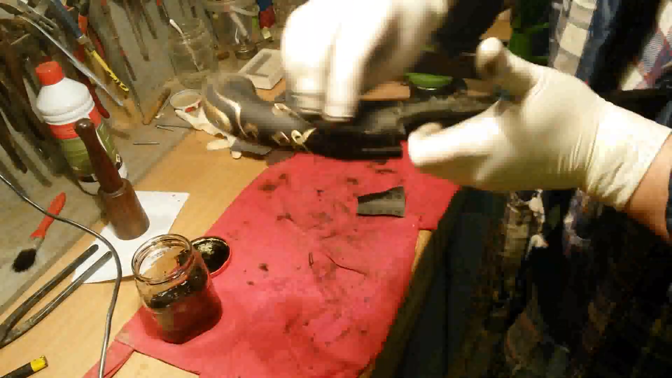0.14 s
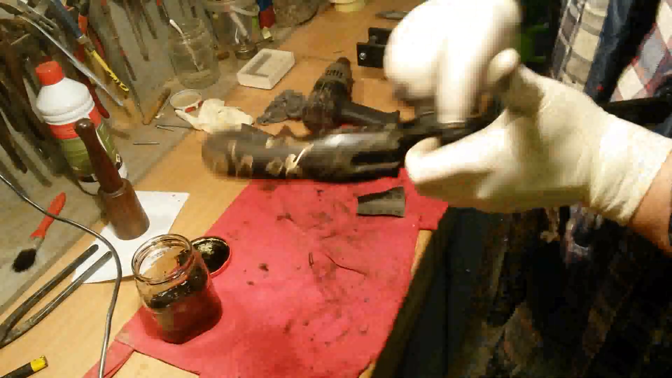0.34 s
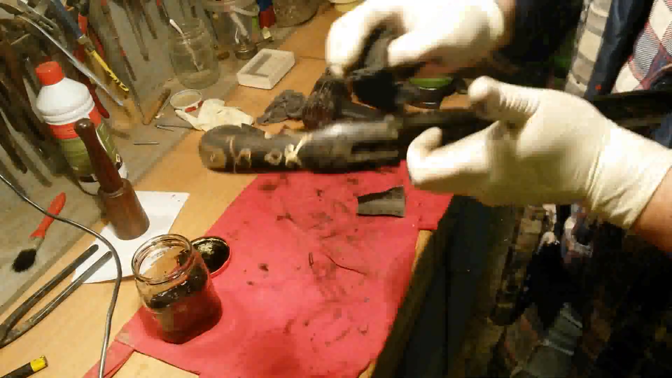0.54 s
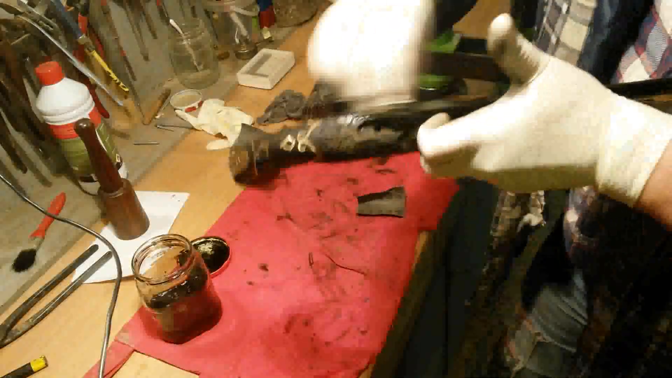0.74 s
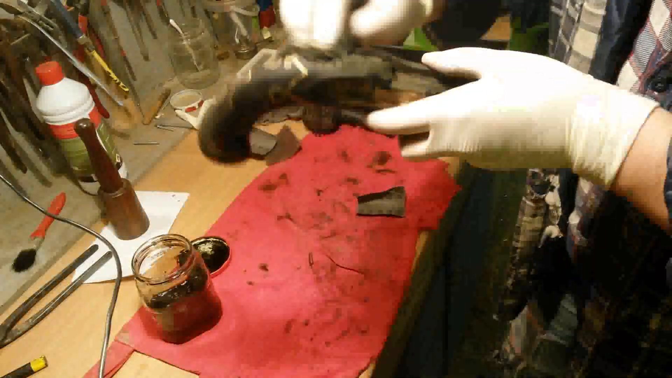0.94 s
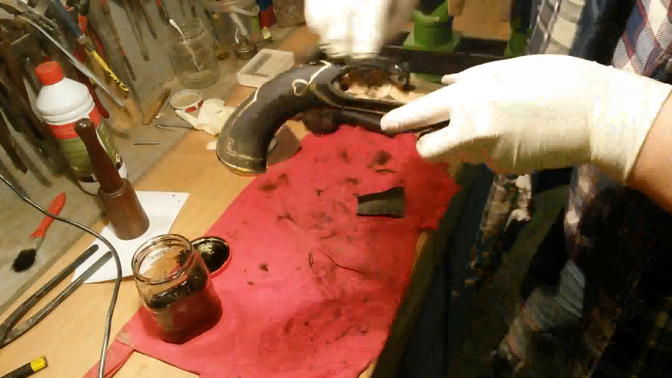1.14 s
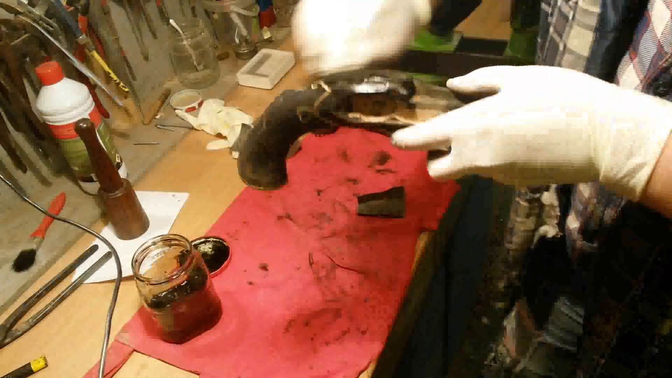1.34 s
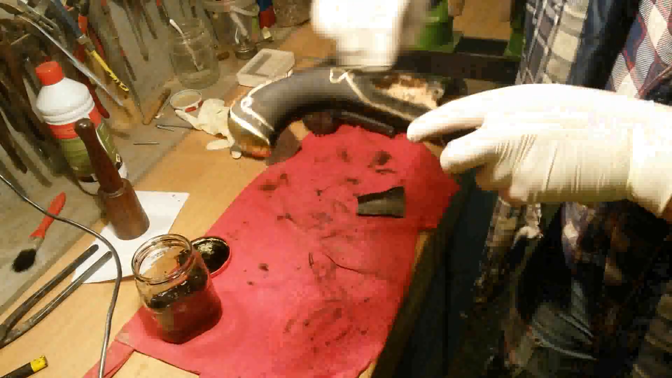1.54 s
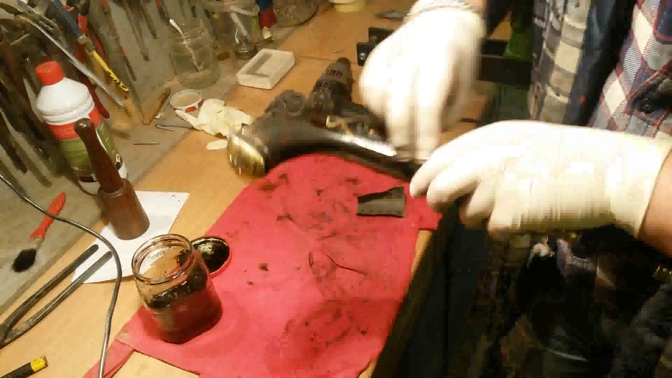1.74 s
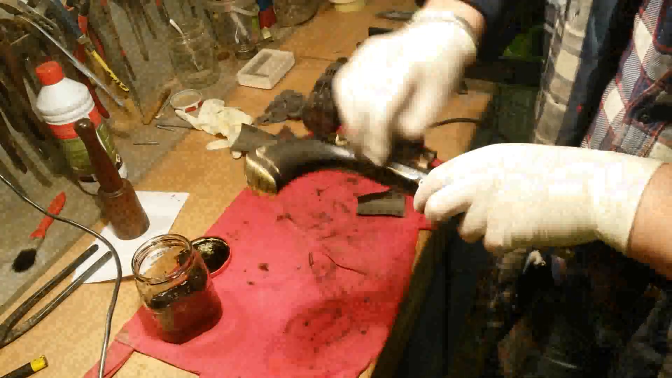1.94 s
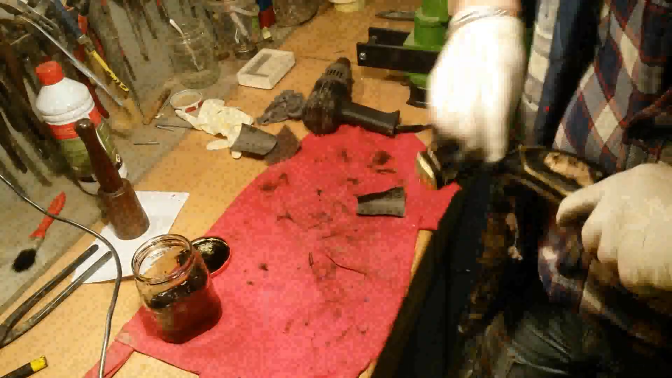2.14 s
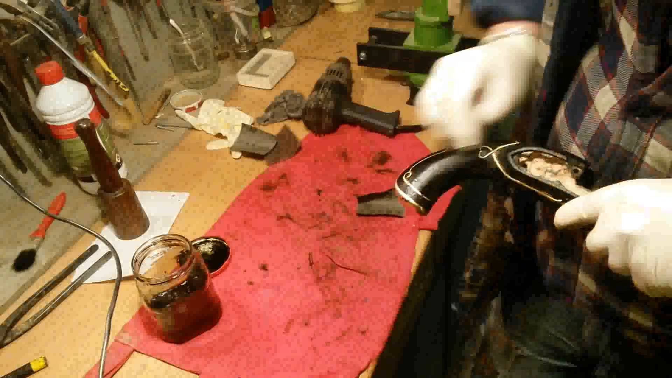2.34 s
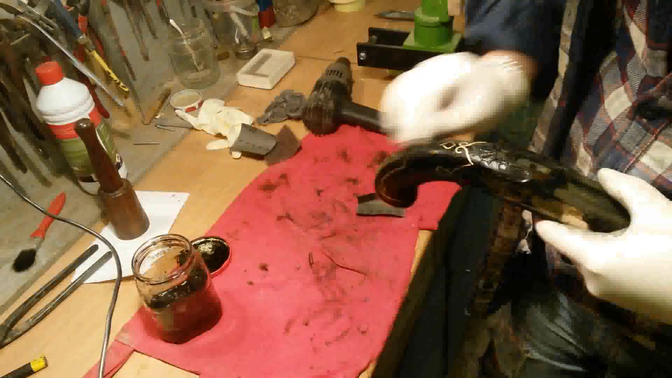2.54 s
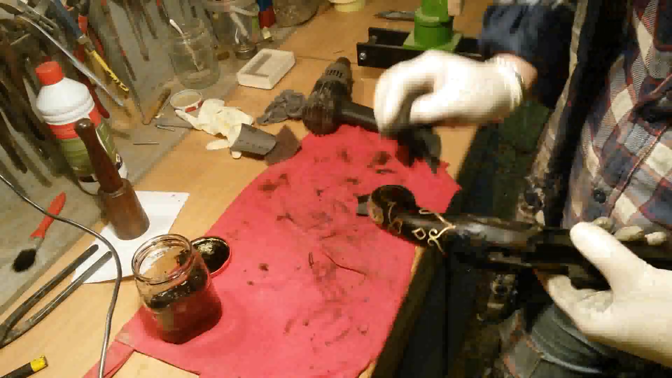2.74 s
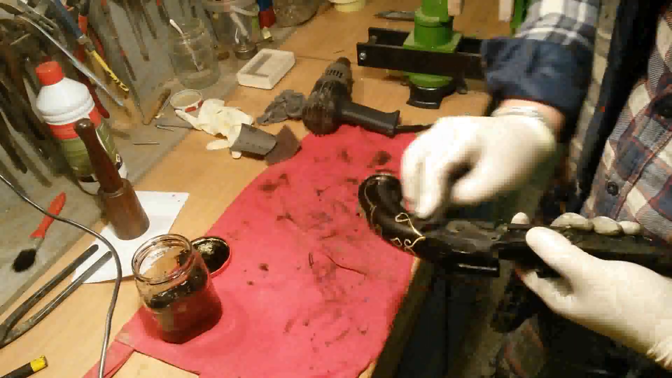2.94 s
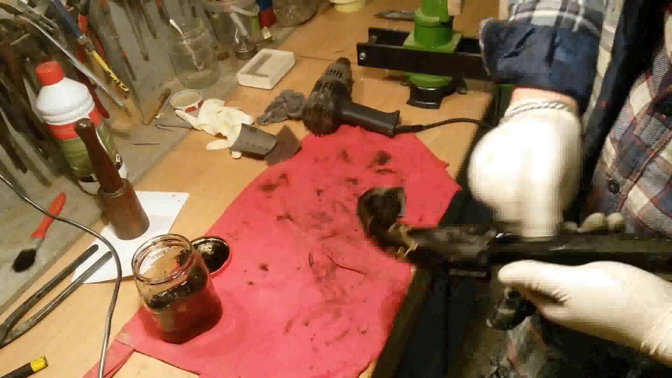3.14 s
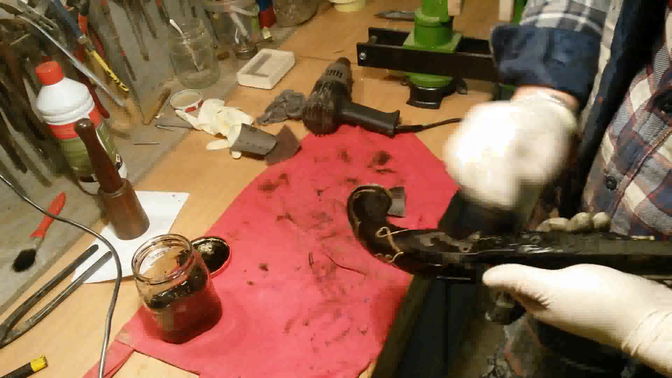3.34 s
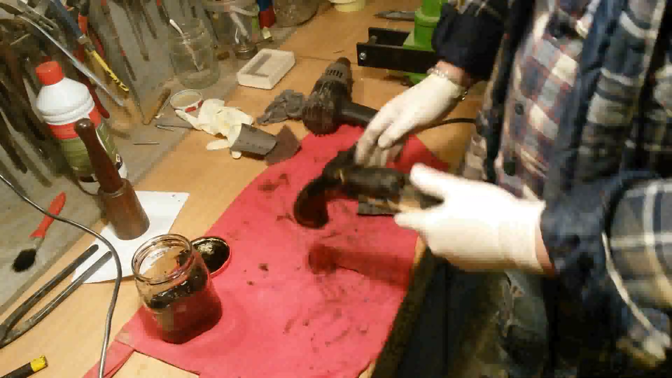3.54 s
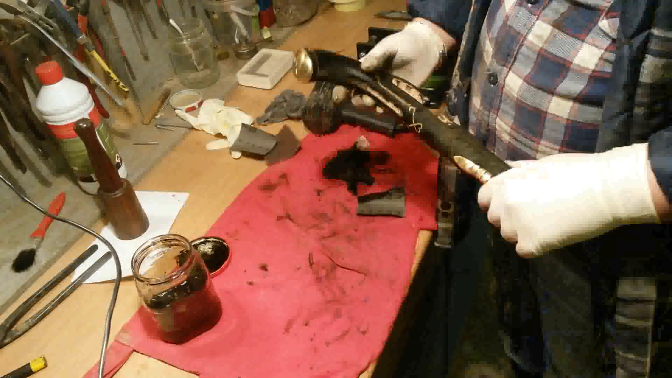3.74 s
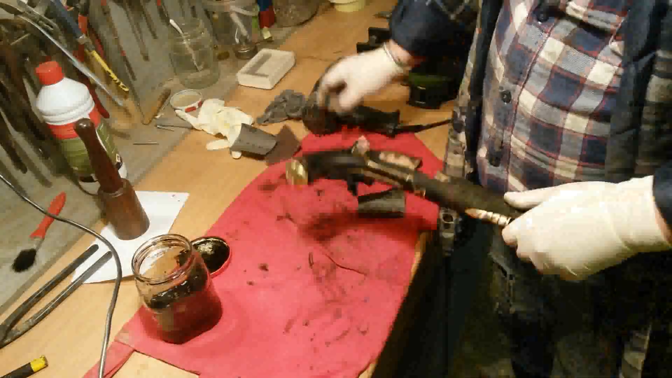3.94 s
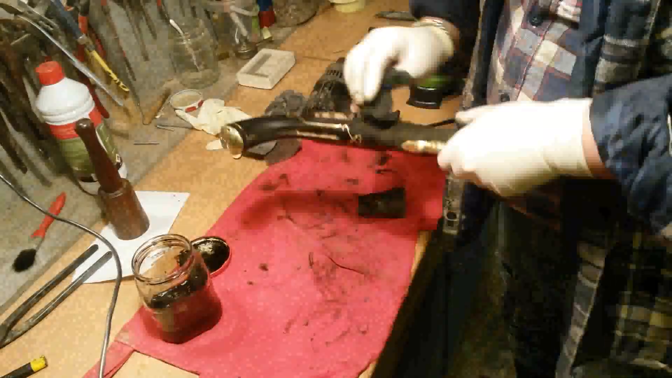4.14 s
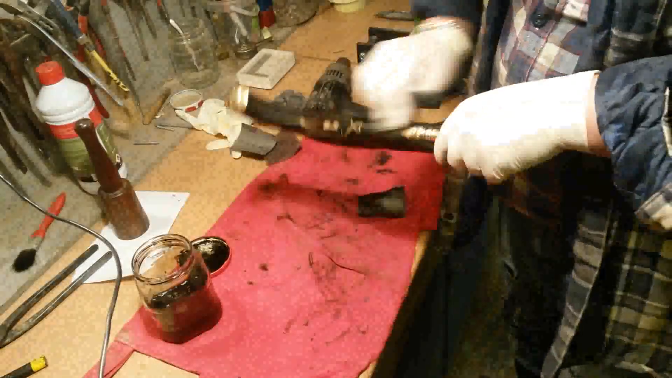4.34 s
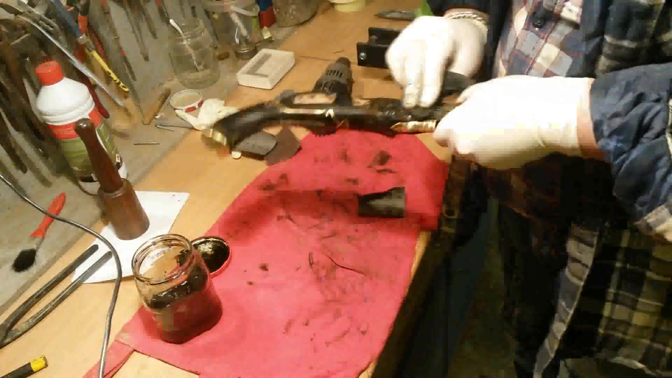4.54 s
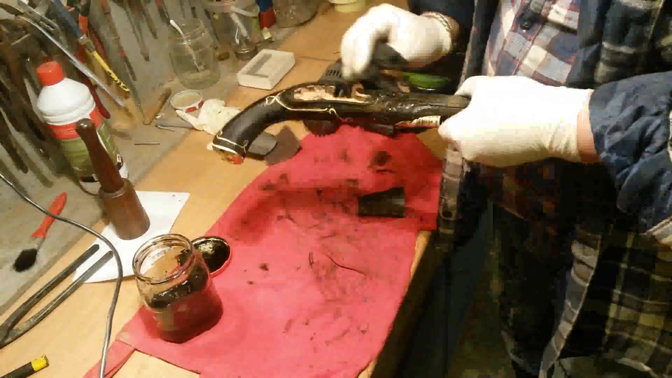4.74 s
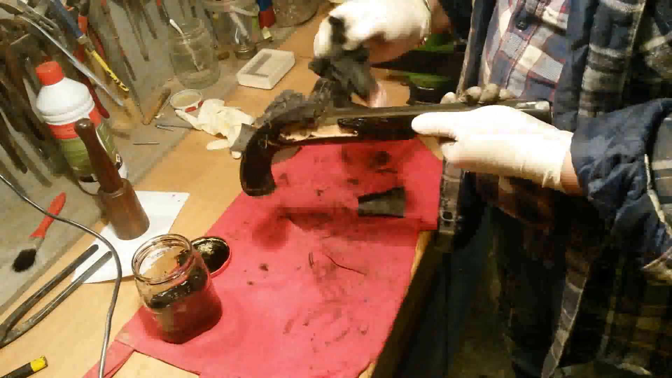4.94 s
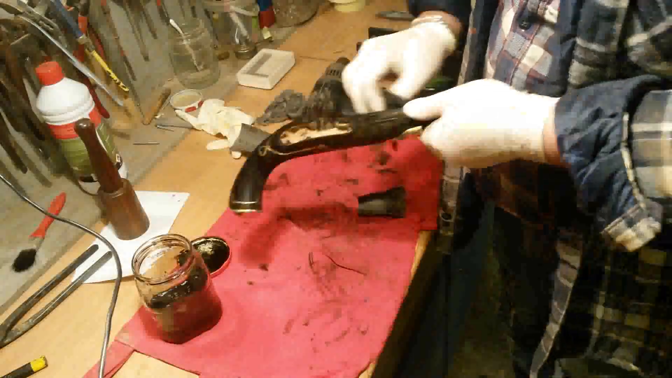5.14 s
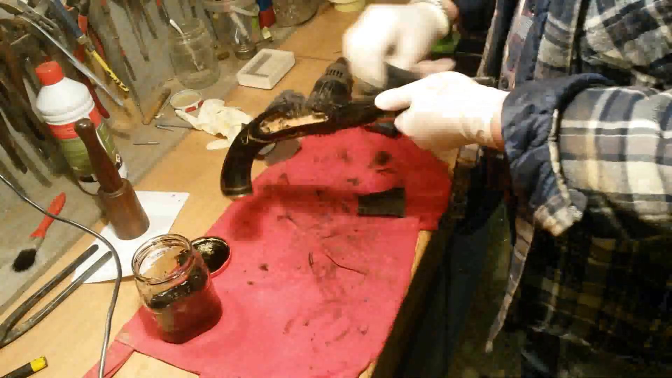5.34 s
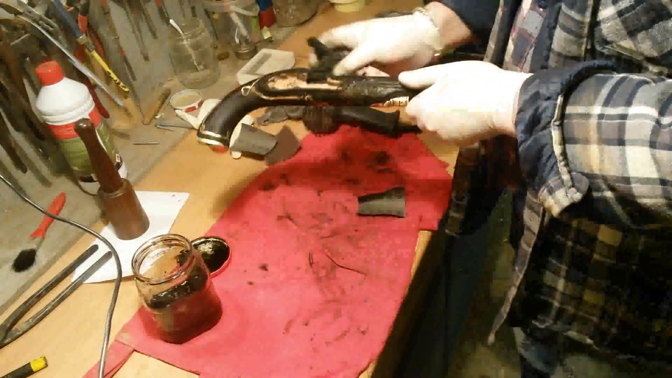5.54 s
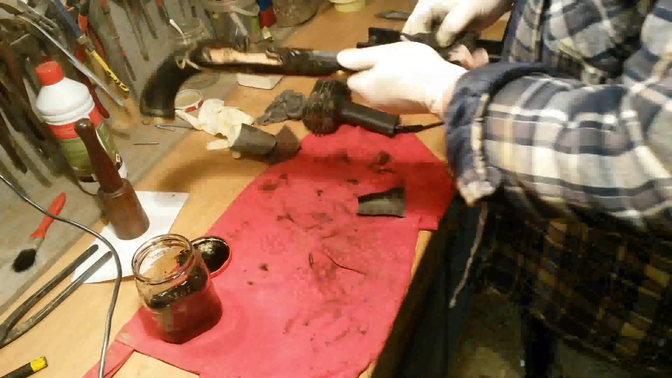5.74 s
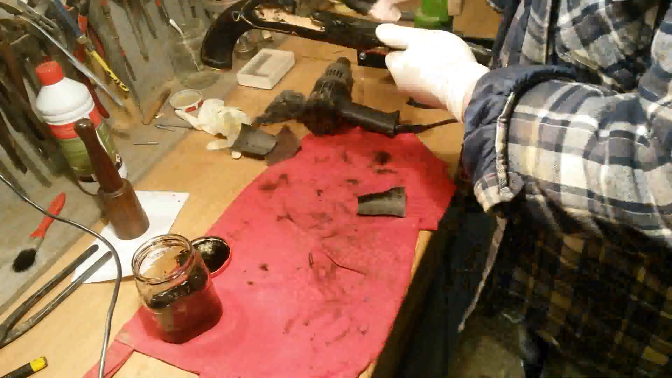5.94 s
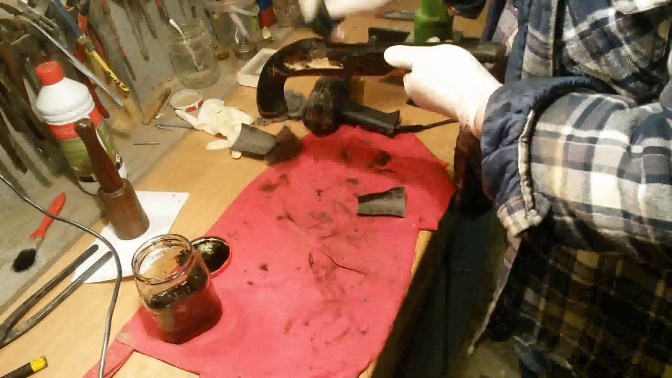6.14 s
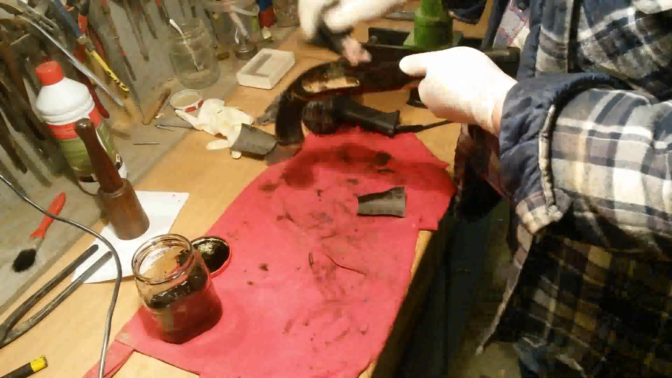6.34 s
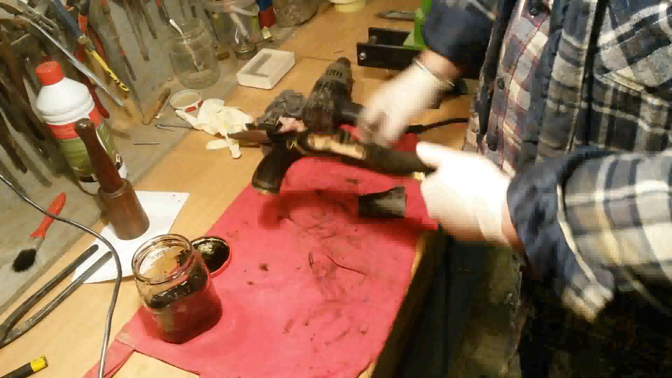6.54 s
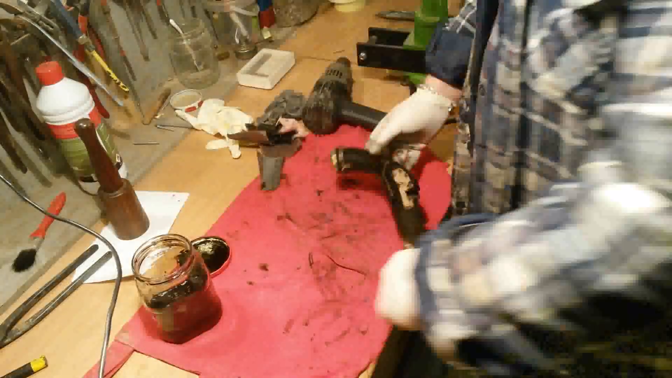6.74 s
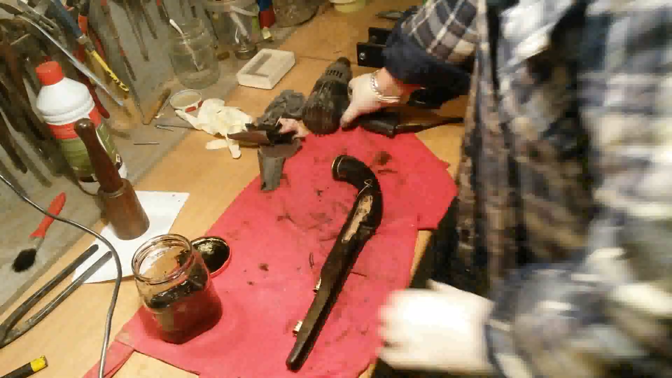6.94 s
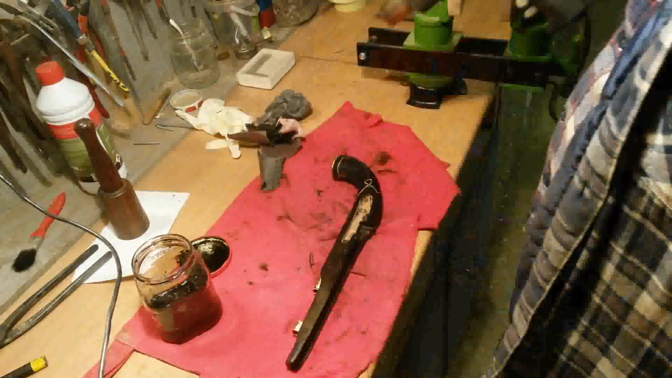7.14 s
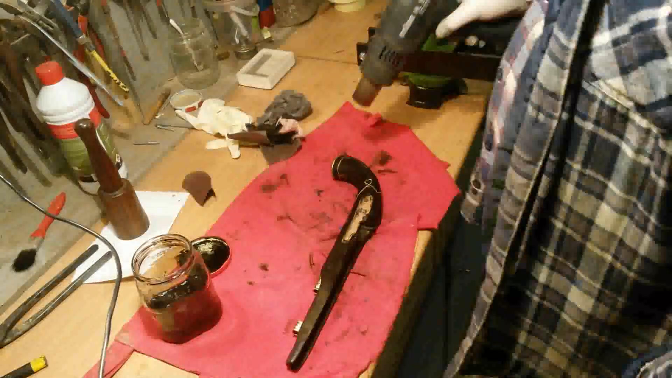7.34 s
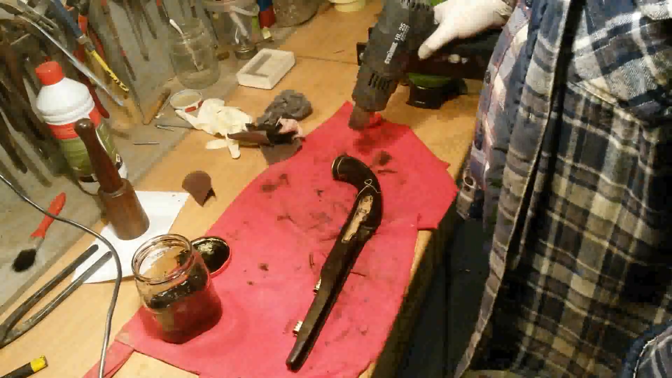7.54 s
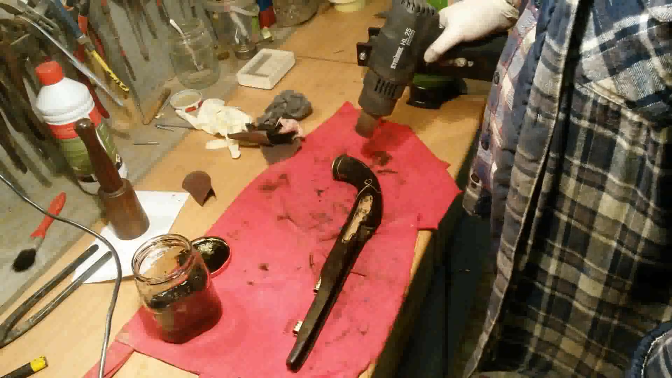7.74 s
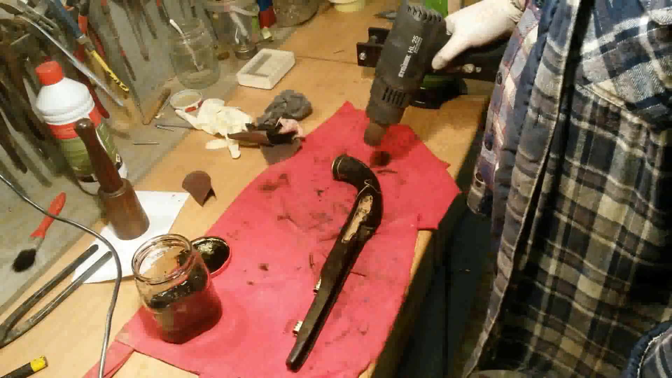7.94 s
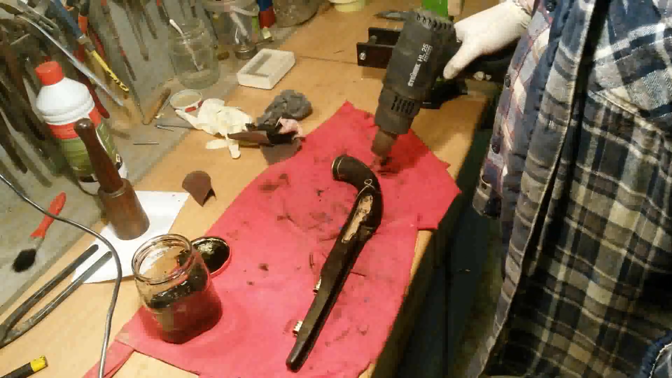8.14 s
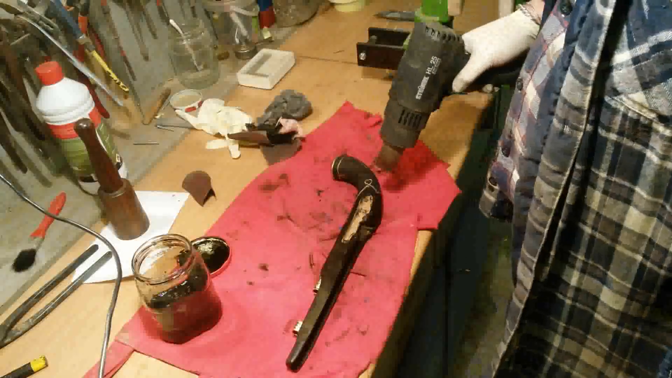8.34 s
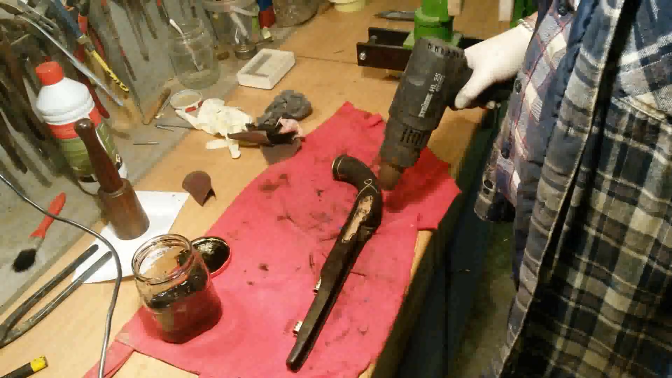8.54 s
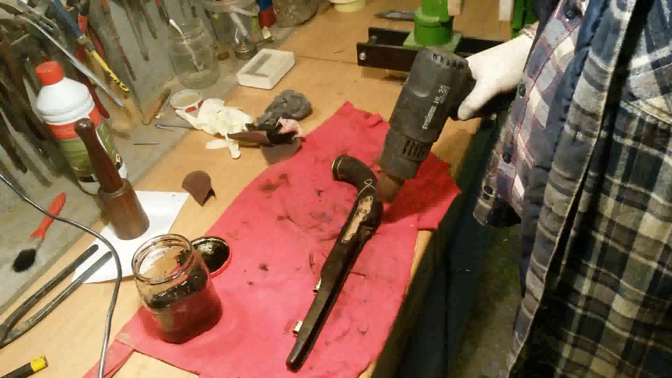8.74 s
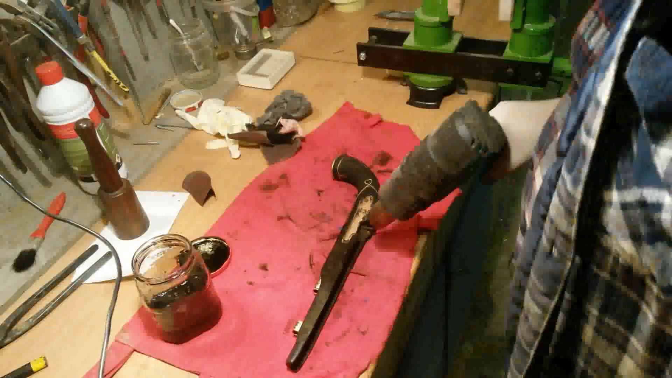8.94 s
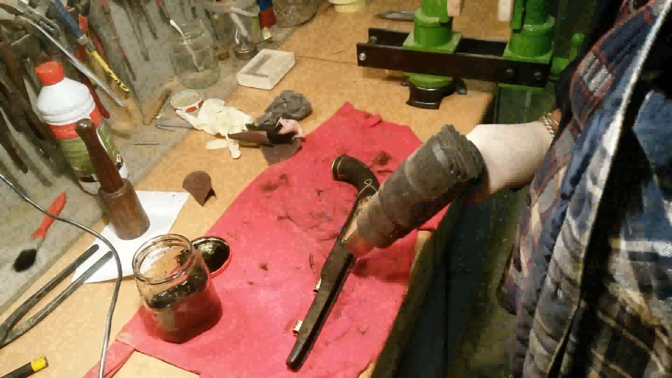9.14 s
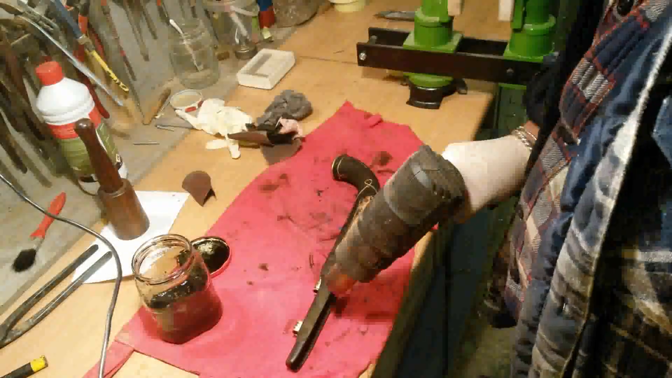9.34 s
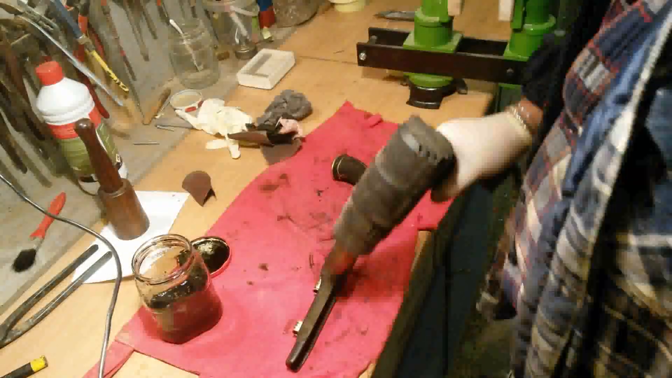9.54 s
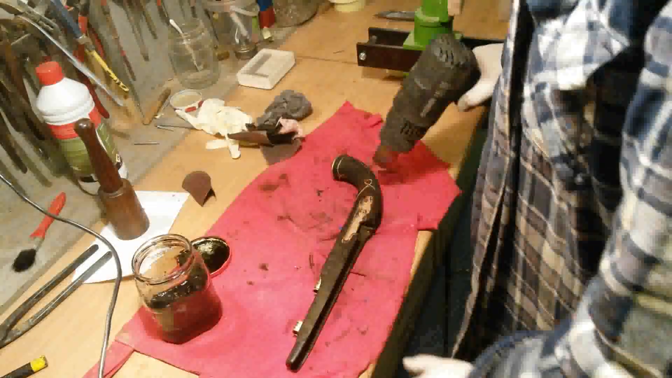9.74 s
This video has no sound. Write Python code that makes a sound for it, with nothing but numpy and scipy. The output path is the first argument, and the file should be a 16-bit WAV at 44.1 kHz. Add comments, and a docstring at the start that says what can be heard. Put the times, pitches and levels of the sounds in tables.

```python
"""Workbench with fans and a hot-air gun

Two small fans hum, as drifting tones over noise that rings in their housings.
Gloved hands rub a wooden stock with a pad (grainy noise), squeak, scuff over the mat (rough noise)
and knock the stock on the bench (ringing modes). Small clicks ring in the same way.
A pistol-grip hot-air gun clatters as it is picked up and is switched on: whine, blade tone, whistles
and rush of air all follow one motor speed, and change as the gun is moved over the wood."""
import sys
import numpy as np
from scipy import signal
from scipy.fft import irfft
from scipy.io import wavfile
from scipy.ndimage import uniform_filter1d

SR = 44100
rng = np.random.default_rng(int(sys.argv[2]) if len(sys.argv) > 2 else 0)


def file_out(sig):
    """Save sig as 16-bit WAV at sys.argv[1]."""
    # one column per channel
    cols = np.atleast_2d(sig).T
    # limit, then scale
    lim = np.clip(cols, -1, 1)
    pcm = np.round(lim * 32767).astype(np.int16)
    wavfile.write(sys.argv[1], SR, pcm)


N = 432180
TIME = np.arange(N) / SR

# Fans: basic pitch, then partials [multiple of the pitch, level/dB before the flutter]
FAN_A_HZ, FAN_B_HZ = 550.1, 653.3
FAN_A_PARTIALS = [(1, -66), (2, -60.5), (3, -59), (5, -89)]
FAN_B_PARTIALS = [(1, -70.5), (2, -54.5), (3, -70.5), (4, -72), (5, -68.5), (6, -80.5), (7, -80)]
# Air resonances in the fan housings [f/Hz, width/Hz, level/dB per Hz]
HOUSING_RINGS = [(453, 51, -94.5), (563, 75, -89.5), (676, 64, -85.5), (945.5, 21, -82.5), (1030, 77, -84),
                 (1223, 60, -70), (1358, 80, -75.5), (1493, 110, -84), (1727, 123, -80.5),
                 (1890, 80, -91.5), (2060, 330, -94.5), (2520, 270, -99), (3050, 100, -94.5),
                 (3290, 120, -88.5), (3556, 146, -86), (3834, 91, -88.5)]
# Still room: noise floor [f/Hz, level/dB per Hz] and left-right likeness [f/Hz, share 0 to 1]
ROOM_FLOOR = [(20, -118), (70, -115), (135, -117), (270, -110), (400, -102.5), (800, -106.5), (2900, -99),
              (4200, -101), (8000, -101), (12000, -104), (16000, -104)]
FLOOR_LIKENESS = [(60, 0.37), (130, 0.075), (290, 0.22), (640, 1), (1410, 0.97), (3100, 0.33), (6820, 0.15),
                  (15000, 0.085)]
# Left-right likeness of the rubbing, scuffing, puffs and blown air [f/Hz, share 0 to 1]
AIR_LIKENESS = [(60, 0.49), (150, 0.55), (240, 0.65), (380, 0.8), (600, 0.73), (950, 0.87), (1500, 0.97),
                (2380, 0.9), (3770, 0.73), (5980, 0.47), (9470, 0.063), (15000, 0.66)]
# Echo: time to fade by 60 dB [f/Hz, t60/s]
ROOM_FADE = [(200, 0.15), (1000, 0.025), (4000, 0.081), (15000, 0.056)]

# Rubbing strokes [start t/s, length/s, level/dB before the grain]
RUB_STROKES = [(0.0, .11, -61), (0.18, 0.69, -62.5), (0.986, 0.24, -60), (1.25, 0.35, -65.5),
               (1.604, 0.21, -58), (1.81, 0.087, -55), (1.936, 0.64, -59), (2.516, 0.031, -54),
               (2.64, 0.22, -59), (2.992, 0.36, -60.5), (3.833, 0.033, -57), (4.222, 0.51, -60),
               (4.837, 0.074, -61), (5.16, 0.13, -58.5), (5.297, 0.1, -64), (5.628, 0.11, -60),
               (5.73, .08, -59), (6.155, 0.037, -64)]
# Tone colour of the rubbing [f/Hz, relative level/dB]
RUB_SPECTRUM = [(40, 10), (130, -13), (260, -2.5), (400, 0), (700, 10.5), (2200, 8), (4500, 2.5), (9000, 3),
                (16000, -3)]
# The faint handling rustle is also a level before the grain
STROKE_RISE_S, STROKE_FADE_S, HANDLING_DB = 0.017, .035, -65

# Small clicks, the first a barely heard tick, the last two from the switch
# [t/s, level/dB, hardness as upper limit f/Hz, rattle as a share of the blow]
SMALL_CLICKS = [(0.089, -59, 5000, .5), (2.536, -46, 12000, 0.9), (3.480, -52, 12000, 0.99),
                (4.588, -47, 15000, 0.43), (5.607, -52, 15000, .4), (6.760, -55, 14000, .4),
                (7.1196, -32.5, 14800, 0.48), (7.1424, -32.5, 14900, 0.85)]
# Ringing modes of hard plastic [f/Hz, relative level/dB, t60/s]
PLASTIC_MODES = [(1300, -23, .02), (5780, -5.5, 0.0077), (6240, -1, 0.0088), (8300, 2, 0.0033),
                 (9900, -5, 0.011), (11500, -1, 0.0046), (12500, 2, .005), (14800, 11, 0.0028)]
# Knocks and soft bumps of the stock on the bench
# [t/s, level/dB, hardness as upper limit f/Hz, rattle as a share of the blow]
STOCK_KNOCKS = [(3.585, -35, 1700, 0.15), (3.5892, -42, 7000, 0.45), (3.865, -51, 1500, .9),
                (6.7352, -39, 12000, 0.091), (6.9124, -25, 4100, 0.02), (6.9195, -40.5, 970, .1),
                (6.9255, -45, 1100, .1), (6.946, -45, 1200, .2)]
# Ringing modes of wood on the bench [f/Hz, relative level/dB, t60/s]
WOOD_MODES = [(356, -33, 0.05), (540, -38, 0.011), (705, -17.5, 0.092), (1060, -5, 0.02),
              (1220, -1.5, 0.029), (1630, -1, 0.0074), (2010, 1, 0.016), (2210, 1.5, 0.011),
              (2650, 5, 0.0046), (4020, -1, 0.0054), (4840, 1, 0.01), (5660, -1, 0.0076), (6940, 1, 0.0046),
              (8170, -9, 0.0044), (11000, 1, .0012), (14500, 6, .0033)]
# The gun clatters as it is picked up
# [t/s, level/dB, hardness as upper limit f/Hz, rattle as a share of the blow]
GUN_CLATTER = [(7.030, -38, 11500, 1), (7.0335, -45, 850, 0.1), (7.0437, -29.5, 13000, 0.46),
               (7.044, -57, 376, .1), (7.052, -46, 9000, .9)]
# Ringing modes of the gun's hollow casing [f/Hz, relative level/dB, t60/s]
CASING_MODES = [(340, -29, 0.14), (436, -17, 0.049), (750, -10, 0.022), (1300, -12, 0.035),
                (2040, -5, 0.021), (2300, -2, 0.015), (2750, -4, 0.0096), (4040, 4, 0.0022),
                (5570, 6, 0.0048), (6900, 5, 0.0027), (7940, 2, 0.0041), (11000, 6, 0.0011),
                (14500, 9, .0033)]
# Small struck things give off little bass
RADIATES_ABOVE_HZ = 250

# Glove squeaks and low groans of the grip [start t/s, length/s, first f/Hz, last f/Hz, peak level/dB]
GLOVE_SQUEAKS = [(2.475, 0.074, 542, 510, -57), (3.608, .044, 3400, 1390, -45),
                 (3.622, .025, 9900, 5380, -45), (3.79, .08, 2780, 2600, -57),
                 (7.467, 0.046, 566, 522, -47.5)]
# The pad catches, slides and leaves the mat
# [start t/s, length/s, rise/s, body level/dB, edge level/dB], levels before the grain
SCUFF_PUSHES = [(3.581, 0.0034, 0.0027, -38, -40.5), (3.597, 0.025, 0.015, -39, -38.5),
                (3.629, 0.01, 0.0067, -47, -41), (3.646, 0.005, .004, -53, -57)]
# Tone colour of the hollow body and of the scratchy edge [f/Hz, relative level/dB]
SCUFF_BODY_SPECTRUM = [(100, -40), (300, -12), (800, -14), (1300, 8), (1700, -4), (2100, 1), (2600, -3),
                       (3200, 0.5), (3900, -10), (8000, -30)]
SCUFF_EDGE_SPECTRUM = [(1000, -26), (3500, -9), (5400, -1), (9000, -6), (12000, -4), (15500, -4)]
SCUFF_FADE_S = 0.014

# Gun motor: start, time constant of the spin-up, and pitch of the whine at full speed
MOTOR_ON_S, SPIN_UP_S, TOP_HZ = 7.13, .069, 3837.5
# The steady tones come in with these powers of the speed
WHINE_POWER, BLADE_POWER = 7.7, 8.3
# The whine at full speed as the gun turns [t/s, level/dB, left minus right/dB]
WHINE_COURSE = [(7.38, -42.5, -2), (7.5, -45.5, 7), (7.65, -42.5, 3), (8.05, -42.5, 0.5), (8.5, -39.5, -3),
                (8.88, -39.5, -1), (9.03, -42.5, -9), (9.22, -42.5, -8), (9.32, -47, -11),
                (9.55, -52.5, -14), (9.7, -38, -1), (9.8, -43, -1.5)]
# The octave above it, before the casing shapes it [t/s, level/dB, left minus right/dB]
OCTAVE_COURSE = [(7.42, -35.5, -7), (7.49, -29, -1.5), (8.14, -31.5, -3.5), (8.45, -29.5, 3),
                 (8.62, -32.5, 7), (8.83, -37, 8), (8.93, -30.5, -3), (9.25, -34.5, 2.5),
                 (9.55, -35.5, -.5), (9.77, -30, 6)]
# Casing resonance in which the octave sings; the width is to one side
RING_HZ, RING_WIDTH_HZ = 7944, 230
# Pitch of the blade tone as a multiple of the whine's
BLADE_RATIO = 1444.5 / 3836.5
# Blade partials at full speed [multiple of the blade tone, level/dB, share of the facing gain]
BLADE_PARTIALS = [(1, -47.5, -0.099), (2, -44, 1), (3, -63, -0.025), (4, -53.5, 0.043), (5, -58, 0.22),
                  (6, -49.5, -0.3), (7, -48, 0.2), (8, -55, .5)]
# How far the intake faces the listener [t/s, gain/dB]
INTAKE_FACING = [(7.4, -7.5), (8.2, -13.5), (8.38, -9), (8.52, -3.5), (8.75, -2), (8.9, 2.5), (9.12, -4.5),
                 (9.45, -1), (9.8, -1.5)]
# Breathy whistles at full speed
# [multiple of the whine, width/Hz, level/dB, share of the facing gain]
BREATHY_WHISTLES = [(1.265, 129, -53, 0.37), (1.489, 300, -50.5, -0.1), (1.785, 340, -47.5, -0.19),
                    (2.87, 160, -62, -.8), (3, 103, -53.5, -0.1)]
# Partials that flare while climbing through casing resonances
# [multiple of the whine, resonance f/Hz, half width/Hz, level/dB, breathiness as width/Hz]
CASING_FLARES = [(1, 3020, 370, -50.5, 73), (2, 3800, 720, -55, 900), (2, 5300, 500, -47, 200),
                 (2, 6950, 330, -46, 300), (1.785, 5770, 620, -45, 700), (1.785, 6500, 210, -42.5, 500),
                 (2.635, 8350, 350, -43.5, 110), (3.39, 11500, 450, -47, 180), (3, 11000, 220, -51, 180)]

# Air through the gun at full speed [t/s, rush level/dB, hiss level/dB]
AIR_COURSE = [(7.3, -47.5, -34.5), (7.47, -39.5, -33), (8.1, -40, -33.5), (8.41, -37.5, -33.5),
              (8.88, -39.5, -31.5), (9.28, -35, -32), (9.51, -35.5, -31.5), (9.66, -36, -32.5),
              (9.8, -37.5, -34)]
# Tone colour of the nozzle rush and of the intake hiss [f/Hz, relative level/dB]
RUSH_SPECTRUM = [(50, -24), (150, -13), (270, -17), (390, -14), (490, -8.5), (700, -4.5), (1200, 0.5),
                 (2300, 3), (3400, 2.5), (4300, -1), (5200, 2.5), (8000, -2.5), (15000, -22)]
HISS_SPECTRUM = [(500, -50), (3000, -23), (4500, -3), (5300, 1.5), (5750, 3), (6300, -1), (7300, 1.5),
                 (8300, 1), (9100, 4.5), (10400, 3.5), (11000, -1.5), (11900, -1.5), (13300, -1.5),
                 (15700, -2)]
# The hiss changes colour as the intake comes round [f/Hz, share of the facing gain]
HISS_TURNING = [(3000, .05), (5700, 0.1), (6400, 0.027), (8200, 0.015), (9100, -0.067), (10500, 0.26),
                (11900, 0.14), (13500, -0.33), (14600, -0.23), (15500, -.05)]
# The air grows with these powers of the speed; the hiss starts from a faint share
RUSH_POWER, HISS_POWER, FIRST_DRAUGHT = 0.9, 2.8, 0.14
# The low part of the rush has its own constant level, before the speed
SPREAD_BELOW_HZ, LOW_RUSH_DB = 900, -37
# The intake's resonance, heard in the first draught
INTAKE_HZ, INTAKE_WIDTH_HZ, INTAKE_DB = 5740, 910, -46
# Fluttering low edge: middle, typical swing, pace, and the drop below it at full speed
FLUTTER_EDGE_HZ, FLUTTER_OCTAVES, FLUTTER_RATE_HZ, FLUTTER_DB = 490, .42, 28, 17
# Soft, low puffs of noise [start t/s, length/s, level/dB]
LOW_PUFFS = [(7.454, .045, -59.5), (8.968, 0.014, -56), (9.101, .012, -57)]
# Tone colour of the puffs [f/Hz, relative level/dB]
PUFF_SPECTRUM = [(60, -28), (150, -11), (210, -12), (400, -1), (700, -1), (1500, -40), (16000, -80)]

# Upper limit of the whole sound
EDGE_HZ = 15790


def amp(db):
    """Turns decibels into a gain."""
    return 10 ** (np.asarray(db) / 20)


def evened(x):
    """Scales a sound to an average strength (rms) of 1."""
    return x / np.sqrt(np.mean(x ** 2) + 1e-20)


def read(points, hz):
    """Reads a spectrum table between its points, along a log-frequency axis."""
    f, value = np.transpose(points)
    return np.interp(np.log(hz + 1), np.log(f + 1), value)


def curves(rows):
    """Draws each column of a time table as a value for every sample."""
    s, *columns = np.transpose(rows)
    return [np.interp(TIME, s, column) for column in columns]


def add(mix, s, sound):
    """Mixes a sound in at time s."""
    part = mix[round(s * SR):][:len(sound)]
    part += sound[:len(part)]


def stroke(start, length, rise_s, fade_s):
    """Rise, hold and fade of one movement or puff."""
    t = TIME - start
    rise = np.clip(t / rise_s, 0, 1)
    return rise * np.exp(-np.clip((t - length) / fade_s, 0, 20))


def wander(rate_hz):
    """Smooth random curve of rms 1, with little movement faster than rate_hz."""
    hz = np.fft.rfftfreq(N, 1 / SR)[:N // 8]
    real, imag = rng.standard_normal((2, len(hz)))
    return evened(irfft((real + 1j * imag) / (1 + (hz / rate_hz) ** 2), N))


def noise(colour_db, likeness, patchy_db):
    """Stereo noise with a given colour in dB per Hz, left-right likeness and drifting patches."""
    white = rng.standard_normal((2, N)) * np.sqrt(SR / 2)
    hz, _, (a, b) = signal.stft(white, SR, nperseg=1024, noverlap=768)
    same = np.clip(read(likeness, hz), 0, .995)[:, None]
    mid = a * np.sqrt((1 + same) / 2)
    side = b * np.sqrt((1 - same) / 2)
    # smooth the chance across frequency, then across time
    patches = uniform_filter1d(rng.standard_normal(a.shape), size=12, axis=0)
    patches = evened(uniform_filter1d(patches, size=24, axis=1))
    gain = amp(colour_db(hz)[:, None] + patchy_db * patches)
    z = np.array([mid + side, mid - side]) * gain
    return signal.istft(z, SR, nperseg=1024, noverlap=768)[1][:, :N]


def rustle(spectrum, patchy_db):
    """Stereo noise of rms 1, coloured by a spectrum table."""
    return evened(noise(lambda hz: read(spectrum, hz), AIR_LIKENESS, patchy_db))


def turning(hz):
    """Phase of something that turns hz times a second."""
    return 2 * np.pi * np.cumsum(hz) / SR


def whistle(phase, width_hz):
    """A narrow band of noise of rms 1 that rides on a moving pitch."""
    in_step = wander(width_hz / 2) * np.cos(phase)
    quarter_turn = wander(width_hz / 2) * np.sin(phase)
    return evened(in_step + quarter_turn)


def filtered(x, gain_db):
    """A moving filter: gain_db(hz, at) gives dB for each frequency at the samples at."""
    hz, t, z = signal.stft(x, SR, nperseg=768, noverlap=576)
    at = np.minimum(np.round(t * SR).astype(int), N - 1)
    return signal.istft(z * amp(gain_db(hz[:, None], at)), SR, nperseg=768, noverlap=576)[1][:, :N]


def split(x, hz):
    """The parts of a sound below and above hz."""
    low = signal.sosfiltfilt(signal.butter(4, hz, fs=SR, output="sos"), x)
    return low, x - low


def room(x):
    """Echo of a small, cluttered room: sparse reflections that fade at a pace set by frequency."""
    shape = (2, SR // 3)
    taps = rng.standard_normal(shape) * (rng.random(shape) < .08) * (TIME[:SR // 3] > .003)
    hz, t, z = signal.stft(taps, SR, nperseg=128)
    fade = amp(-60 * t / read(ROOM_FADE, hz)[:, None])
    tail = signal.istft(z * fade, SR, nperseg=128)[1]
    return signal.oaconvolve(x[None], tail / np.linalg.norm(tail[0]), axes=1)[:, :N]


def fan_hum(hz, partials, drift, flutter_db):
    """A small fan whose speed drifts and whose partials flutter in the turbulence."""
    phase = turning(hz * (1 + drift * wander(2.72)))
    hum = np.zeros(N)
    for k, db in partials:
        level = np.sqrt(2) * amp(db + flutter_db * wander(8.4))
        hum += level * np.sin(k * phase + rng.uniform(0, 2 * np.pi))
    return hum


def fan_air():
    """Noise of the air ringing in the fan housings, over the floor of the room."""
    def colour_db(hz):
        power = amp(read(ROOM_FLOOR, hz)) ** 2
        for f, width, db in HOUSING_RINGS:
            power = power + amp(db) ** 2 / (1 + ((hz - f) / (0.55 * width)) ** 2) ** 2
        return 10 * np.log10(power)
    return noise(colour_db, FLOOR_LIKENESS, patchy_db=1.88)


def rubbing():
    """Soft, grainy strokes of the pad under uneven pressure, over a faint handling rustle."""
    power = amp(HANDLING_DB) ** 2
    for s, length, db in RUB_STROKES:
        power = power + (amp(db) * stroke(s, length, STROKE_RISE_S, STROKE_FADE_S)) ** 2
    fibres = rustle(RUB_SPECTRUM, patchy_db=1.2)
    grain = amp(1.5 + 1.44 * wander(97) + 1.2 * wander(21))
    return fibres * np.sqrt(power) * grain


def strikes(rows, modes, rattle_s):
    """A blow and a brief rattle ring the modes; soft blows leave out the high ones."""
    out, t = np.zeros(N), TIME[:SR // 6]
    ring = sum(amp(db - 60 * t / t60) * np.cos(2 * np.pi * hz * t) for hz, db, t60 in modes)
    ring = ring * np.heaviside(t, .5)  # half weight on the first sample
    radiation = signal.butter(4, RADIATES_ABOVE_HZ, "high", fs=SR, output="sos")
    for s, db, hard_hz, rattle in rows:
        chatter = rng.standard_normal(len(t)) * np.exp(-t / rattle_s)
        force = signal.unit_impulse(len(t)) + rattle * chatter / np.linalg.norm(chatter)
        contact = signal.butter(4, hard_hz, fs=SR, output="sos")
        struck = signal.fftconvolve(force, ring)[:len(t)]
        sound = signal.sosfilt(np.vstack([contact, radiation]), struck)
        # the table's level is that of the loudest 4 ms
        loudest = np.sqrt(uniform_filter1d(sound ** 2, size=SR // 250).max())
        add(out, s, amp(db) * sound / loudest)
    return out


def squeaks():
    """Rubber slips in short, falling chirps with a rough pitch."""
    out = np.zeros(N)
    for s, length, first_hz, last_hz, db in GLOVE_SQUEAKS:
        n = round(length * SR)
        hz = np.geomspace(first_hz, last_hz, n) * (1 + 0.1 * rng.standard_normal(n))
        add(out, s, amp(db) * np.sqrt(2) * np.hanning(n) * np.sin(turning(hz)))
    return out


def scuff():
    """One quick, rough swipe in a few pushes: a hollow body and a scratchy edge, catching grain by grain."""
    body = rustle(SCUFF_BODY_SPECTRUM, patchy_db=2.5)
    edge = rustle(SCUFF_EDGE_SPECTRUM, patchy_db=2.0)
    pushes = np.zeros((2, N))
    for s, length, rise_s, body_db, edge_db in SCUFF_PUSHES:
        texture = amp(body_db) * body + amp(edge_db) * edge
        pushes += stroke(s, length, rise_s, SCUFF_FADE_S) * texture
    return pushes * amp(2.8 * wander(220))


def motor_speed():
    """Share of full speed: the motor closes in on it exponentially."""
    return 1 - np.exp(-np.maximum(TIME - MOTOR_ON_S, 0) / SPIN_UP_S)


def flares(hz, phase):
    """Each partial shrieks for as long as its rising pitch lies in a resonance of the casing."""
    return sum(amp(db) / (1 + ((k * hz - ring_hz) / width) ** 4) * whistle(k * phase, breath)
               for k, ring_hz, width, db, breath in CASING_FLARES)


def gun_motor():
    """Whine, blade tone and whistles all follow the speed; turbulence shakes their pitch and level."""
    speed = motor_speed()
    hz = TOP_HZ * speed
    whine_db, whine_pan_db = curves(WHINE_COURSE)
    octave_db, octave_pan_db = curves(OCTAVE_COURSE)
    facing_db, = curves(INTAKE_FACING)
    phase = turning(hz * (1 + 0.00048 * wander(9.6) + 0.00041 * wander(1.41)))
    shaken = phase + 0.17 * wander(45)
    sides = np.array([[.5], [-.5]])  # left, right

    whine_level = amp(whine_db + sides * whine_pan_db + 1.64 * wander(41))
    whine = whine_level * np.sin(shaken + 0.24 * sides * wander(0.79))

    # the octave sings out once it has climbed into a resonance of the casing
    ring = 1 / np.hypot(1, (2 * hz - RING_HZ) / RING_WIDTH_HZ)
    octave_level = amp(octave_db + sides * octave_pan_db + 1.3 * wander(30))
    # its short waves arrive out of step on the left and right
    octave = octave_level * np.sin(2 * shaken + sides * (0.41 + 0.12 * wander(3.3)))
    octave = ring * (octave + amp(-49) * whistle(2 * phase, width_hz=130))

    blades = np.zeros((2, N))
    for k, db, lean in BLADE_PARTIALS:
        level = amp(db + lean * facing_db + 1.5 * wander(39))
        blades += level * np.sin(k * BLADE_RATIO * phase + 0.21 * k * sides * wander(0.71))

    whistles = sum(amp(db + lean * facing_db) * whistle(k * phase, width)
                   for k, width, db, lean in BREATHY_WHISTLES)
    breathy = speed ** 6 * whistles + flares(hz, phase) * (speed > 0)
    tones = speed ** WHINE_POWER * (whine + octave) + speed ** BLADE_POWER * blades
    return np.sqrt(2) * tones + breathy + amp(-6) * room(breathy)


def gun_air():
    """Nozzle rush and intake hiss grow with the speed and change as the gun moves."""
    speed = motor_speed()
    rush_db, hiss_db = curves(AIR_COURSE)
    facing_db, = curves(INTAKE_FACING)
    low, rest = split(rustle(RUSH_SPECTRUM, patchy_db=1.06), SPREAD_BELOW_HZ)
    # the long waves spread evenly, however the gun is turned
    rush = rest * amp(rush_db) + low * amp(LOW_RUSH_DB)

    jet = rustle(HISS_SPECTRUM, patchy_db=1.6)
    hiss = filtered(jet, lambda hz, at: read(HISS_TURNING, hz) * facing_db[at])
    # the intake hisses faintly from the first turn, and rings until the flow has settled
    draught = FIRST_DRAUGHT * (speed > 0) + (1 - FIRST_DRAUGHT) * speed ** HISS_POWER
    ring = whistle(2 * np.pi * INTAKE_HZ * TIME, INTAKE_WIDTH_HZ)
    ring = ring * stroke(MOTOR_ON_S, length=0.31, rise_s=.03, fade_s=.06)
    intake = amp(INTAKE_DB) * (ring + amp(-2.0) * room(ring))
    return rush * speed ** RUSH_POWER + hiss * amp(hiss_db) * draught + intake


def flutter(x):
    """While the gun blows, the low edge of the sound jumps up and down many times a second."""
    edge_hz = FLUTTER_EDGE_HZ * 2 ** (FLUTTER_OCTAVES * wander(FLUTTER_RATE_HZ))
    depth_db = FLUTTER_DB * motor_speed()
    return filtered(x, lambda hz, at: -depth_db[at] / (1 + (hz / edge_hz[at]) ** 20))


def low_puffs():
    """Soft, low puffs of noise, each with a quick rise and fade."""
    puffs = sum(amp(db) * stroke(s, length, rise_s=.005, fade_s=0.005) for s, length, db in LOW_PUFFS)
    return puffs * rustle(PUFF_SPECTRUM, patchy_db=2.5)


def scene():
    """Mixes the fans, hands, knocks, gun and puffs; the struck sounds and squeaks get an echo."""
    hum = fan_hum(FAN_A_HZ, FAN_A_PARTIALS, drift=0.0011, flutter_db=1.2)
    hum += fan_hum(FAN_B_HZ, FAN_B_PARTIALS, drift=0.0013, flutter_db=2)
    clicks = strikes(SMALL_CLICKS, PLASTIC_MODES, rattle_s=0.0032)
    knocks = squeaks() + strikes(STOCK_KNOCKS, WOOD_MODES, rattle_s=0.0062)
    knocks += strikes(GUN_CLATTER, CASING_MODES, rattle_s=0.006)
    hits = knocks + amp(-6.5) * room(knocks) + clicks + amp(-6.5) * room(clicks)
    # the low edge flutters in all the soft, steady sounds
    soft = flutter(hum + fan_air() + rubbing() + gun_air())
    return soft + hits + scuff() + gun_motor() + low_puffs()


def record(dry):
    """Cuts off the highest treble with a steep filter."""
    lowpass = signal.firwin(1501, EDGE_HZ, window=("kaiser", 8), fs=SR)
    return signal.oaconvolve(dry, lowpass[None], "same", axes=1)


dry = scene()
out = record(dry)
file_out(out)
```